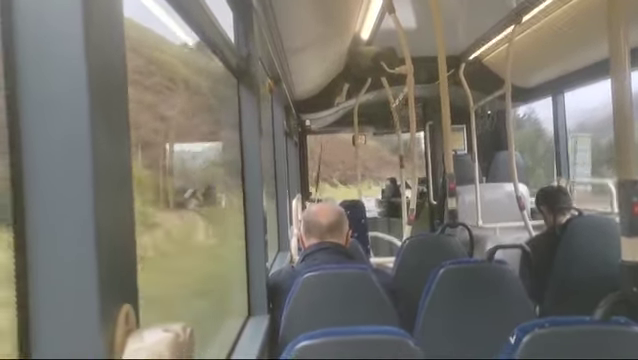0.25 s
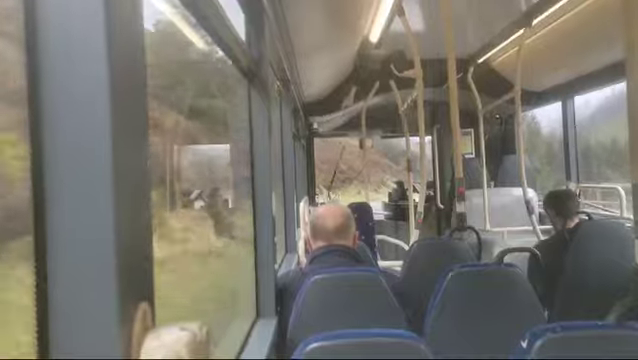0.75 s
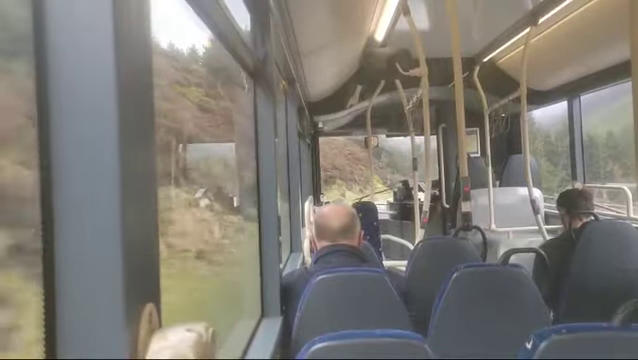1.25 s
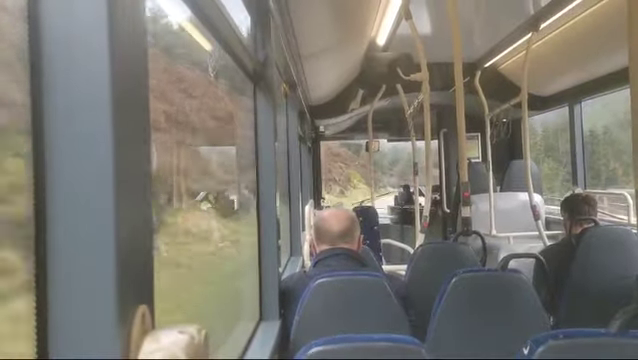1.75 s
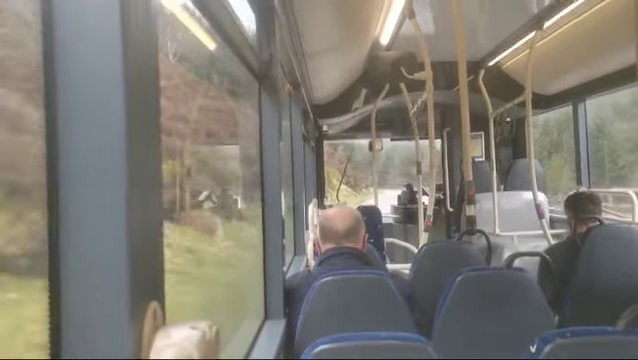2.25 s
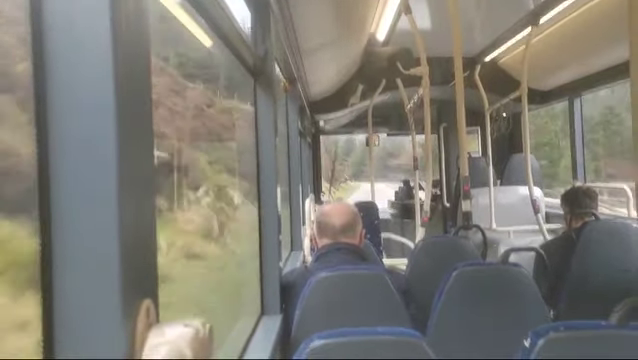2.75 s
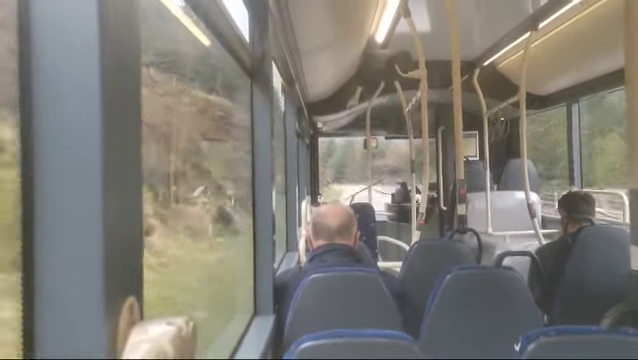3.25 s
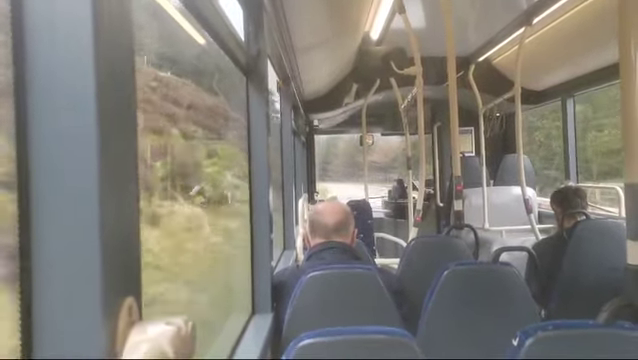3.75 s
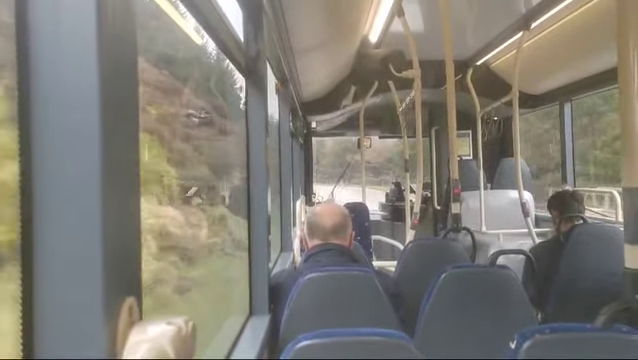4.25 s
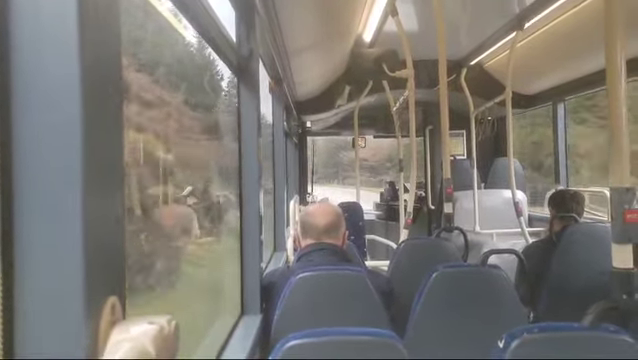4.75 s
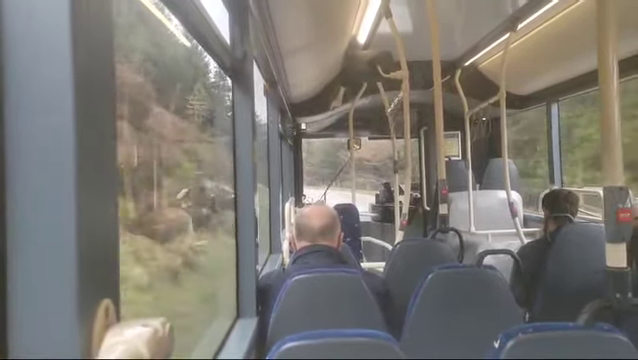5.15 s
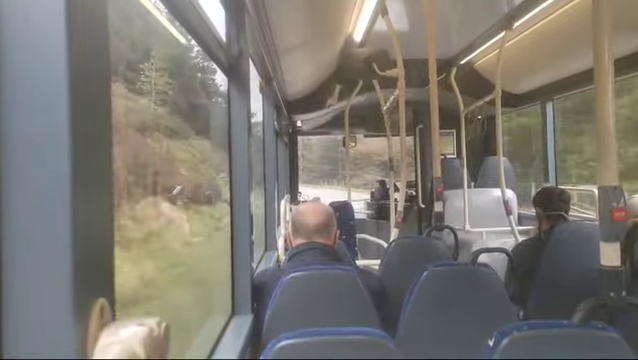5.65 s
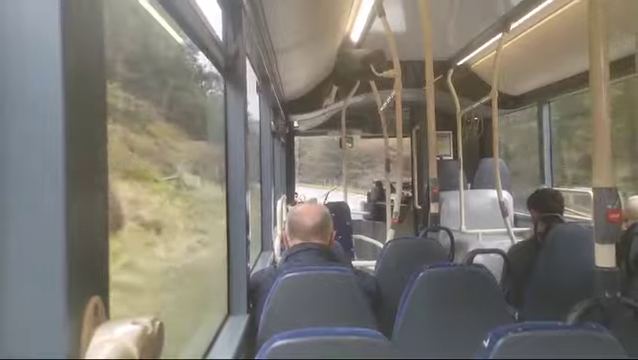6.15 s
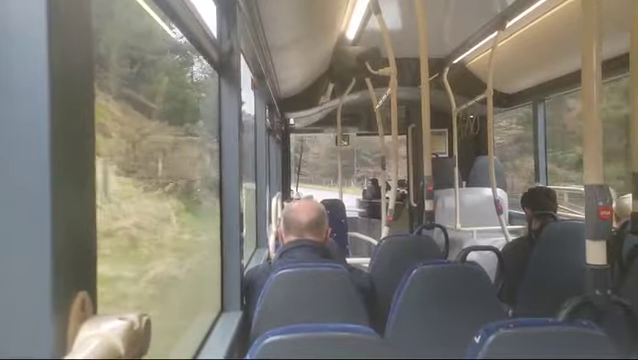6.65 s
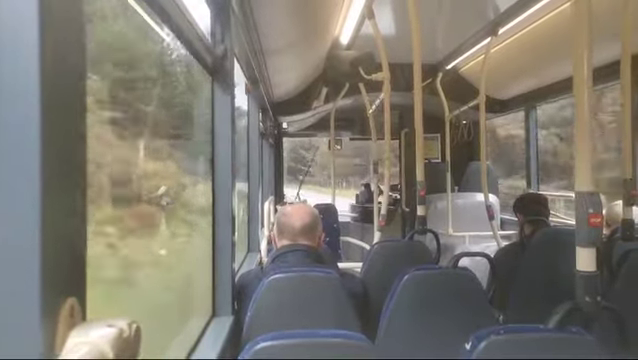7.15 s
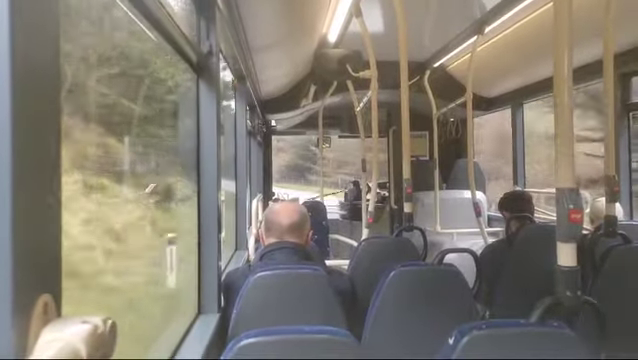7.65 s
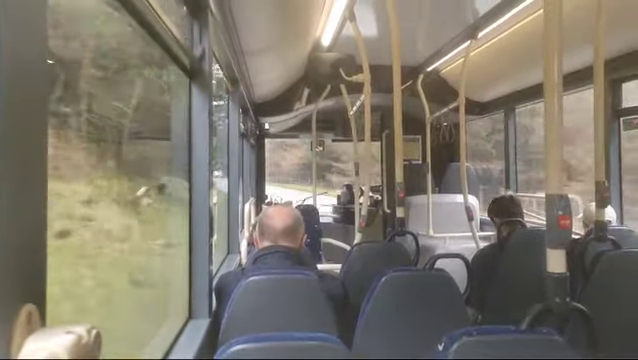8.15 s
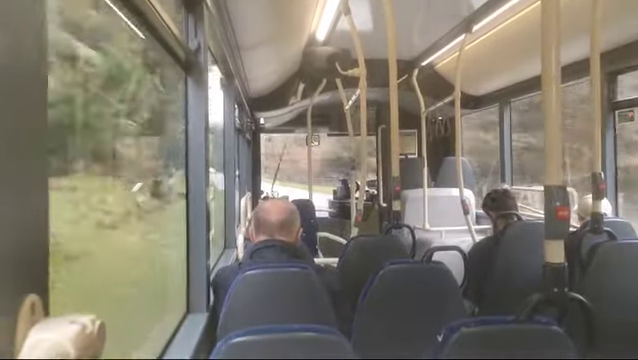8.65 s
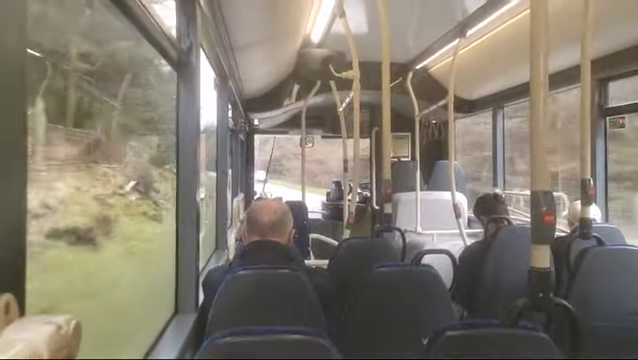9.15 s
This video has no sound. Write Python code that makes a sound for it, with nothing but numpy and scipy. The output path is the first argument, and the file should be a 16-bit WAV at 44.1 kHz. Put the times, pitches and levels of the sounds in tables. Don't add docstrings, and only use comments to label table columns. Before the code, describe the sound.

From a rear seat of a diesel bus, the first second is rough: panels knock and trim ticks over chattering road roar. The bus coasts smoothly, then the engine pulls, a thin, very high whistle sweeping up and fading around three seconds. Low boom, hum and gear whine climb gradually, with a few later knocks. Close, enclosed stereo cabin sound.

```python
import sys
import numpy as np
from scipy import signal
from scipy.fft import rfft, irfft, next_fast_len
from scipy.io import wavfile
from scipy.ndimage import uniform_filter1d, minimum_filter1d

SR = 44100
rng = np.random.default_rng(int(sys.argv[2]) if len(sys.argv) > 2 else 0)


def volts(x):
    e = np.asarray(x, float) / 20
    return 10 ** e


def dump(signal):
    limited = np.clip(np.atleast_2d(signal).T, -1, 1)
    pcm = np.round(limited * 32767).astype(np.int16)
    wavfile.write(sys.argv[1], SR, pcm)


N = 414540
TIME = np.arange(N) / SR
SIDES = np.array([[1], [-1]])


def curves(table):
    s, *columns = np.transpose(table)
    return [np.interp(TIME, s, column) for column in columns]


def read(table, hz):
    table_hz, value = np.transpose(table)
    return np.interp(np.log(np.maximum(hz, 1)), np.log(table_hz), value)


def walk(rate):
    hold = int(SR / rate)
    levels = np.repeat(rng.standard_normal(N // hold + 1), hold)
    return 1.8 * uniform_filter1d(uniform_filter1d(levels, hold), hold)[:N]


def lift(hz, modes):
    return 1 + sum((volts(db) - 1) / (1 + (2 * (hz - f) / w) ** 2) for f, w, db in modes)


# pitch_hz, side_minus_mid_db
SPREAD = [(60, -28), (100, -24.5), (180, -14.5), (310, -11.5), (530, -4.5), (910, -1), (1560, 2),
          (2690, -1.5), (4640, 0.5), (7990, 0)]


def tone(hz, gain, side_db=0., flutter_db=0.68):
    phase = 2 * np.pi * (np.cumsum(hz) / SR + rng.random())
    side = volts(read(SPREAD, hz.mean()) + side_db) * np.cos(phase)
    return np.sqrt(2) * gain * volts(flutter_db * walk(9)) * (np.sin(phase) + SIDES * side)


# time_s, engine_cycles_hz
SPEED = [
    (0.0, 13.837),
    (1.0, 13.607),
    (1.5, 13.567),
    (2.0, 13.733),
    (2.5, 13.907),
    (3.0, 14.241),
    (4.0, 14.863),
    (6.5, 16.552),
    (8.0, 17.541),
    (9.4, 18.415),
]
# time_s, load_db
LOAD = [
    (0, -5),
    (1.6, -5),
    (2.4, -1),
    (5, 1),
    (9.4, 2),
]


def swell(order, modes, power=1):
    load = volts(curves(LOAD)[0])
    coarse = slice(None, None, 441)
    coarse_hz = order * curves(SPEED)[0][coarse]
    return load ** power * np.interp(TIME, TIME[coarse], lift(coarse_hz, modes))


def order_lines(cycle_hz, orders, dbs, paths, side_db, power=1):
    out = 0
    for order, db, path in zip(orders, dbs, paths):
        gain = volts(db + order / 100) * swell(order, path, power)
        out += tone(order * cycle_hz, gain, side_db, .8 + order / 130)
    return out


FIRING_ORDERS = [4, 7, 8, 9]
FIRING_DB = [-34, -35.5, -33.5, -37]
# pitch_hz, width_hz, lift_db
FIRING_PATHS = [
    [(61.5, 2.6, 16), (64.6, 2.0, 20), (65.7, .9, 16), (70.2, 1.2, 8)],
    [(99, 2.0, 11), (105.5, 7, 10)],
    [(128, 7, 8), (141.5, 5, 11)],
    [(135, 7, 15), (148, 12, 10)],
]


def firing(cycle_hz):
    return order_lines(cycle_hz, FIRING_ORDERS, FIRING_DB, FIRING_PATHS, side_db=-4.)


CYCLE_ORDERS = [3, 6, 10, 11, 12, 13, 15, 16, 18, 20, 22, 24, 26, 30, 36, 42, 48, 60, 72, 108, 135, 144,
                288]
CYCLE_DB = [-50.5, -40.5, -37.5, -42.5, -43.5, -50.5, -55, -58.5, -50, -51.5, -56, -54, -59, -57, -69,
            -73.5, -75.5, -77.5, -73, -74.5, -79.5, -83.5, -77.5]
# pitch_hz, width_hz, lift_db
CABIN = [(47.3, 4.0, 11), (85.6, 5.0, 10.5), (190.3, 12, 4.5), (219.5, 2, 3), (236.3, 16, 16.5),
         (312, 8.1, 12), (394, 5.3, 6), (438, 17, 5.5), (480, 15.0, -9.5), (659, 27, 18.5), (740, 91, 17.5),
         (1090, 50.0, 7.5), (1926, 90.0, 16.5), (2300, 300, 21.5)]


def uneven_cylinders(cycle_hz):
    out = 0
    for order, db in zip(CYCLE_ORDERS, CYCLE_DB):
        out += tone(order * cycle_hz, volts(db) * swell(order, CABIN), flutter_db=2.5)
    return out


GEAR_ORDERS = [27, 54]
GEAR_DB = [-49, -61]
# pitch_hz, width_hz, lift_db
GEAR_PATHS = [
    [(374.5, 5.7, 13.2), (392.1, 6.9, 19), (409.7, 3.6, 2), (445.8, 19.8, 16.7), (472.4, 12, 7.9)],
    [(746, 15, 9.9), (920, 80, 2.3)],
]


def gears(cycle_hz):
    return order_lines(cycle_hz, GEAR_ORDERS, GEAR_DB, GEAR_PATHS, side_db=3.)


MESH_LOAD_POWER = 2.2
AXLE_ORDERS = [17.16, 34.32, 51.48]
AXLE_DB = [-60, -58, -64]
# pitch_hz, width_hz, lift_db
AXLE_PATHS = [
    [(239.5, 5, 38), (244, 5.5, 38.5), (251, 4, 24), (233.5, 3, 30), (296, 8, 12)],
    [(507, 18, 12), (590, 18, 7)],
    [(768, 36, 11), (865, 40, 6)],
]


def axle(cycle_hz):
    return order_lines(cycle_hz, AXLE_ORDERS, AXLE_DB, AXLE_PATHS, -1., MESH_LOAD_POWER)


SHAFT_ORDERS = [2.7, 5.15]
SHAFT_DB = [-43.5, -40]
# pitch_hz, width_hz, lift_db
SHAFT_PATHS = [
    [(45, 2.5, 11), (49.1, 2.0, 18.4)],
    [(71.2, 0.86, 18), (82, 1.5, 6.3), (88, 4, 19.8)],
]


def shaft(cycle_hz):
    return order_lines(cycle_hz, SHAFT_ORDERS, SHAFT_DB, SHAFT_PATHS, -5., MESH_LOAD_POWER)


PUMP_ORDERS = 50.07 * np.arange(1, 6)
PUMP_DB = [-70, -73, -77, -76, -78]
# pitch_hz, width_hz, lift_db
PUMP_PATHS = [
    [(745, 15, 11), (825, 40, 11)],
    [(1400, 40, 6), (1840, 60, 7)],
    [(2410, 40, 16), (2560, 90, 24), (2730, 120, 19)],
    [(2880, 50, 23), (3070, 55, 22), (3440, 90, 11), (3598, 50, 22)],
    [(3900, 150, 8), (4500, 70, 18)],
]


def pump(cycle_hz):
    return order_lines(cycle_hz, PUMP_ORDERS, PUMP_DB, PUMP_PATHS, side_db=-.1)


def drivetrain():
    cycle_hz, = curves(SPEED)
    cycle_hz = cycle_hz + .004 * np.gradient(walk(25)) * SR / (2 * np.pi)
    lines = firing(cycle_hz) + gears(cycle_hz) + axle(cycle_hz) + shaft(cycle_hz) + pump(cycle_hz)
    return lines + uneven_cylinders(cycle_hz)


# time_s, pitch_hz, level_db
TURBO = [
    (1.1, 8650, -83),
    (1.7, 10160, -77),
    (2.3, 13100, -83),
    (2.33, 13050, -57.5),
    (2.7, 15460, -59),
    (2.8, 16000, -64),
    (2.98, 15550, -55),
    (3.15, 15900, -68),
    (4.5, 15500, -74.5),
]
TURBO_FADE_DB_S = 112
TOP_SPEED_S, SPOOL_WIDTH_HZ, TOP_WIDTH_HZ = 2.75, 220, 450


def turbo():
    hz, db = curves(TURBO)
    db = db - TURBO_FADE_DB_S * np.clip(TIME - TURBO[-1][0], 0, 1)
    width = np.where(TIME < TOP_SPEED_S, SPOOL_WIDTH_HZ, TOP_WIDTH_HZ)
    carrier = np.exp(2j * np.pi * np.cumsum(hz) / SR)
    steps = 2.2 * np.cumsum(width) / SR
    knots = np.arange(steps[-1] + 2)
    out = []
    for _ in SIDES:
        real = np.interp(steps, knots, rng.standard_normal(len(knots)))
        imaginary = np.interp(steps, knots, rng.standard_normal(len(knots)))
        out.append(np.real(carrier * (0.77 + real + 1j * imaginary)))
    return volts(db) * np.array(out) * volts(-4 * SIDES)


def bandpass(x, low_hz, high_hz):
    return signal.sosfilt(signal.butter(2, [low_hz, high_hz], "band", fs=SR, output="sos"), x)


def strikes(events, width_hz, broad_db, boost_db):
    out, t = np.zeros((2, N)), np.arange(4000) / SR
    for s, db, hz, pan, t60 in events:
        near, spread = rng.standard_normal(len(t)), rng.standard_normal((2, len(t)))
        envelope = np.exp(-np.log(1000) * t / t60) * (1 - np.exp(-t / .0005))
        burst = (near + .5 * spread) * envelope
        ring = bandpass(burst, max(hz - width_hz / 2, 100), hz + width_hz / 2)
        crack = bandpass(burst, hz * 0.77, min(hz * 1.9, 16000))
        hit = ring / abs(ring).max() + volts(broad_db) * crack / abs(crack).max()
        i = int(s * SR)
        out[:, i:i + len(t)] += volts(db + boost_db + SIDES * pan / 2) * hit
    return out


# start_s, peak_db, pitch_hz, left_minus_right_db, t60_s
TICKS = [(0.2259, -40.5, 7440, -7.5, 0.035), (0.3544, -39.5, 7560, -4, 0.026),
         (0.417, -38.5, 11030, -10, 0.039), (0.474, -45, 7400, -7, 0.032), (0.5504, -51, 8280, -3.5, 0.044),
         (0.6365, -47, 8350, -5, 0.035), (0.7503, -54.5, 8000, -0.5, 0.042), (0.845, -62, 7700, 8, 0.035),
         (0.9318, -67.5, 7590, 8, 0.035), (2.7284, -59, 7770, -2, 0.035), (2.813, -58.5, 7850, -0.5, 0.035),
         (3.0126, -54, 7780, -4.5, 0.038), (3.3335, -50.5, 7920, -4, 0.038), (5.0943, -64, 7800, 10, 0.035),
         (5.335, -56.5, 7470, 3.5, 0.041), (8.4092, -48.5, 7600, -4, 0.03), (8.523, -43, 7600, 3, 0.03),
         (9.184, -56, 7760, -8, 0.064)]
# start_s, peak_db, pitch_hz, left_minus_right_db, t60_s
KNOCKS = [(0.0986, -29.5, 2040, -2, 0.031), (0.1565, -26, 2180, -1, 0.025), (0.209, -32, 2190, 0, 0.033),
          (0.2584, -32, 2370, -1, 0.027), (0.3494, -30, 3160, 2, 0.025), (0.3986, -38, 2570, 1, 0.016),
          (0.488, -26.5, 4470, 1, 0.025), (0.6498, -32, 3570, -1, 0.028), (5.3368, -26, 3430, -0.5, 0.019),
          (5.7696, -38, 3150, -7, 0.025), (6.4876, -31, 3300, -3.5, 0.045), (6.561, -32, 3280, -3.0, 0.025),
          (6.7, -47.5, 2170, -2.5, 0.022), (8.267, -30, 3260, -4, 0.025)]
# pitch_hz, level_db
THIN = [(8300, -0.5), (8800, -8.5), (9150, -30), (9500, -31), (10000, -21), (11300, -13), (12400, -18),
        (14000, -22), (16000, -29)]


def loose_trim():
    ticks = strikes(TICKS, width_hz=5800, broad_db=4.0, boost_db=8.5)
    knocks = strikes(KNOCKS, width_hz=900, broad_db=0.0, boost_db=1.5)
    thinning = volts(read(THIN, np.fft.rfftfreq(N, 1 / SR)) / 2)
    return irfft(rfft(ticks + knocks) * thinning, N)


# time_s, level_db
BOOM = [(0, 3.5), (.45, 8), (.6, 1.5), (.9, -4), (1.85, -6), (2.35, -1), (3.36, -0.5), (3.55, -4),
        (4.8, -7.5), (5.65, -0.5), (6.5, 0), (6.65, -1.5), (7.1, 1.5), (7.57, 2), (7.75, -0.5),
        (8.5, 1.5), (8.7, 0.5), (9.4, 3)]
# time_s, roughness (0-1)
PATCH = [
    (0, 1),
    (.04, .65),
    (.1, 1.08),
    (.25, 1.08),
    (.31, .7),
    (.48, .95),
    (.54, .6),
    (.62, .4),
    (.92, 0),
]
JOINT_S, JOINT_ROUGH, JOINT_WIDTH_S = 8.53, .17, .07
CRUISE_HZ = 17
DRONE_PER_BOOM, DRONE_PER_LOAD, DRONE_PATCH_DB, DRONE_DB = .3, 0.62, 7.5, -0.47
HISS_DB_PER_HZ, HISS_PER_LOAD, HISS_PATCH_DB, HISS_DB = 1.12, 0.065, 12, 0.21
RATTLE_PER_LOAD, RATTLE_PATCH_DB, RATTLE_JOINT_DB, RATTLE_DB = 1.6, 23, 8.5, -1.5


def body():
    (boom,), (patch,), (load,), (cycle_hz,) = map(curves, (BOOM, PATCH, LOAD, SPEED))
    joint = np.exp(-abs(TIME - JOINT_S) / JOINT_WIDTH_S)
    rough = patch + JOINT_ROUGH * joint
    drone = DRONE_DB + DRONE_PER_BOOM * boom + DRONE_PER_LOAD * load + DRONE_PATCH_DB * rough
    hiss = HISS_DB + HISS_DB_PER_HZ * (cycle_hz - CRUISE_HZ) + HISS_PER_LOAD * load + HISS_PATCH_DB * rough
    rattle = RATTLE_DB + RATTLE_PER_LOAD * load + RATTLE_PATCH_DB * patch + RATTLE_JOINT_DB * joint
    return boom, drone, hiss, rattle, np.clip(rough, 0, 1)


# pitch_hz, level_db_per_hz
LOW = [(11, -49), (18, -13.5), (57, -2.5), (87, -0.5), (149, -5), (280, -21.5), (422, -25), (474, -28),
       (600, -32.5), (780, -65), (1320, -120)]
# pitch_hz, level_db_per_hz
HIGH = [(350, -32), (600, -7.5), (648, 0), (739, -6.5), (891, -5), (1480, -10.5), (1920, -7.5),
        (2420, -9.5), (3020, -6.5), (3800, -9.5), (4340, -10), (6590, -19), (7270, -16.5), (8300, -26.5),
        (10800, -56), (18300, -120)]
# pitch_hz, width_hz, lift_db
PANELS = [(48, 10, 2.5), (68.8, 12, 5.5), (91, 29, 3.5), (137, 10, -1.5), (179, 22, 6), (237, 27, 2.5),
          (368, 120, 3), (3110, 150, 1), (7600, 150, 0)]


def noise_colour(hz):
    low, high = (volts(read(table, hz)) * lift(hz, PANELS) for table in (LOW, HIGH))
    high = np.where(hz < 8300, high, volts(read(HIGH, 8300) + read(THIN, hz)))
    low, high = low * (hz < 600), high * (hz >= 600)
    return sum(volts(db) * c / np.sqrt(np.mean(c ** 2)) for c, db in ((low, -19.5), (high, -41.5)))


LAYER_HZ = [
    70,
    250,
    450,
    750,
    1500,
    8500,
    9300,
]
# engine_cycles_hz, width_hz, lift_db
AXLE_ROAR = [
    (14.1, .7, 5),
]
GROWL_PER_LOAD = .4
PATCH_DULL_DB = 5


def road():
    hz = np.fft.rfftfreq(N, 1 / SR)
    mid, side = rfft(rng.standard_normal((2, N))) * noise_colour(hz)
    pair = mid + SIDES * side * volts(read(SPREAD, hz))
    boom, drone, hiss, rattle, rough = body()
    growl = GROWL_PER_LOAD * np.minimum(curves(LOAD)[0], 0)
    roar = 20 * np.log10(lift(curves(SPEED)[0], AXLE_ROAR))
    roaring_floor = (drone + hiss) / 2 + roar + growl
    dulled_hiss = hiss - PATCH_DULL_DB * rough
    layers = np.array([boom, drone, roaring_floor, hiss + growl, hiss, dulled_hiss, rattle])[:, ::64]
    place = 2 * np.log2(np.maximum(hz, 1) / 20)
    out, shake, chatter = 0, walk(18), walk(45.2)
    for band in range(21):
        centre = np.interp(np.log(20 * 2 ** (band / 2)), np.log(LAYER_HZ), np.arange(len(LAYER_HZ)))
        k = min(int(centre), len(LAYER_HZ) - 2)
        db = np.repeat((k + 1 - centre) * layers[k] + (centre - k) * layers[k + 1], 64)[:N]
        db += .5 * walk(8) + 0.47 * (band / 20) ** 3 * shake
        db += 1.1 * (band > 9) * rough * (chatter + 0.6 * walk(50))
        window = np.sqrt(np.clip(1 - abs(place - band), 0, 1))
        out = out + volts(db) * irfft(pair * window, N)
    return out


def scene():
    return drivetrain() + turbo() + loose_trim() + road()


def top_cut(x):
    return signal.sosfilt(signal.butter(12, 15800, fs=SR, output="sos"), x)


# pitch_hz, left_minus_right_db
PORTS = [(60, 0), (180, 1.5), (310, 1.5), (530, -2), (910, 1), (1560, -0.5), (2690, -4), (4640, -3.5),
         (8000, 2.5), (9500, 14.5), (13000, -0.5)]


def record(dry):
    size = next_fast_len(N + 2000)
    closed = np.hstack([dry, np.linspace(dry[:, -1], dry[:, 0], size - N, axis=1)])
    port_gain = volts(SIDES * read(PORTS, np.fft.rfftfreq(size, 1 / SR)) / 2)
    x = irfft(rfft(closed) * port_gain, size)[:, :N]
    peak = -minimum_filter1d(-abs(x).max(axis=0), 600)
    gain = uniform_filter1d(np.minimum(1, (0.56 / peak) ** 0.51), 900)
    return top_cut(x * gain)


dry = scene()
out = record(dry)
dump(out)
```